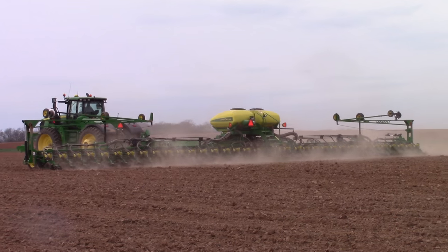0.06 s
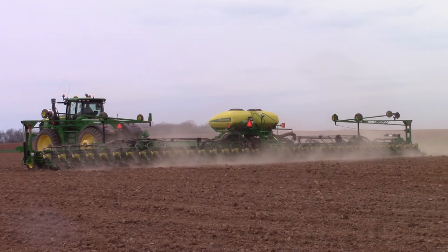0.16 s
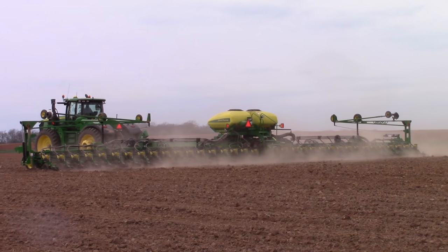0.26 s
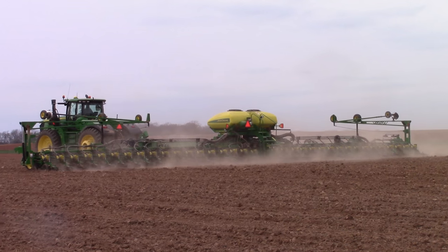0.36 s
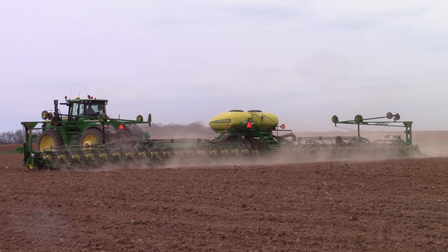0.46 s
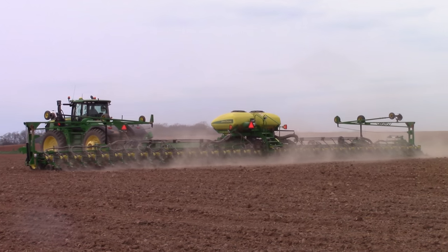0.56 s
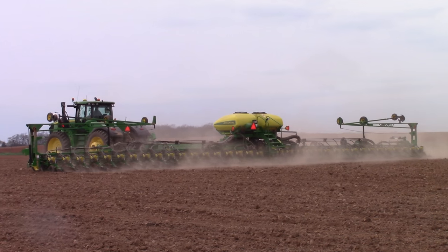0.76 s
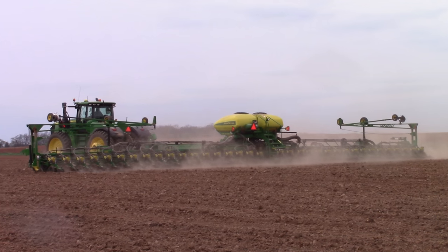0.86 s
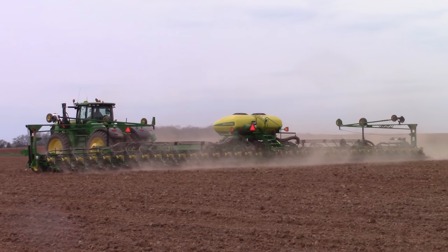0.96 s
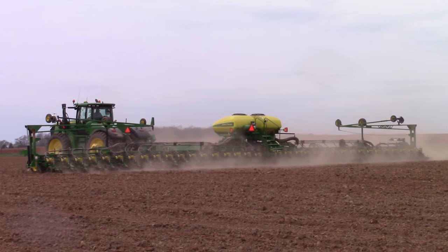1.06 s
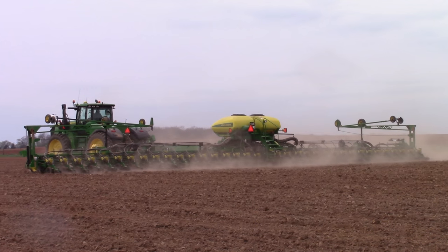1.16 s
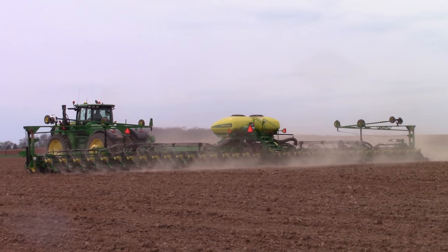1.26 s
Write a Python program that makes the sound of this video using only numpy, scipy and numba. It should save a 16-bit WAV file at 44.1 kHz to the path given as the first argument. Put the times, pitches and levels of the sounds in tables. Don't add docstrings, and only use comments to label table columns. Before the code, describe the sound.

Steady far-off tractor drone with a high mechanical whine, faint metallic squeaks and bursts of wind buffeting

```python
import sys
import numpy as np
from scipy import signal
from scipy.fft import rfft, irfft
from scipy.io import wavfile
from scipy.ndimage import uniform_filter1d
from numba import njit

SR = 44100
rng = np.random.default_rng(int(sys.argv[2]) if len(sys.argv) > 2 else 0)


def nominal_scale(level):
    x = np.asarray(level, float) / 20
    return 10 ** x


def int16_out(signal):
    q = np.round(np.clip(np.atleast_2d(signal).T, -1, 1) * 32767)
    wavfile.write(sys.argv[1], SR, q.astype(np.int16))


N = 57330

# pitch_hz, density_db (per Hz)
DRONE_BODY = [(30, -32), (110, -6), (300, -14.5), (500, -11), (620, -1.5), (850, -14.5), (960, -14),
              (1500, -14), (2500, -76)]
# pitch_hz, density_db (per Hz)
DRONE_HISS = [(880, -13.5), (1500, -6), (2100, -5.5), (2400, -9), (4700, -17), (5300, -23), (9400, -23.5),
              (13000, -45)]


def level(x, db):
    return x * nominal_scale(db) / np.sqrt(np.mean(x ** 2))


@njit
def moving_bandpass(x, hz, width_hz):
    y = np.empty(len(x))
    band_state, low_state = 0., 0.
    for i in range(len(x)):
        g = np.tan(np.pi * hz[i] / SR)
        damping = width_hz / hz[i]
        v = (band_state + g * (x[i] - low_state)) / (1 + g * (g + damping))
        band_state = 2 * v - band_state
        low_state = low_state + 2 * g * v
        y[i] = damping * v
    return y


def noise_band(hz, width_hz):
    centre_hz = np.zeros(N) + hz
    once = moving_bandpass(rng.standard_normal(N), centre_hz, 1. * width_hz)
    return level(moving_bandpass(once, centre_hz, 1. * width_hz), 0)


def walk(rate_hz):
    hold = int(SR / rate_hz)
    steps = np.repeat(rng.standard_normal(N // hold + 1), hold)
    return 1.3 * uniform_filter1d(uniform_filter1d(steps, hold), hold)[:N]


def curve(table):
    return np.interp(np.arange(N) / SR, *np.array(table).T)


def coloured_noise(table, db):
    hz = np.fft.rfftfreq(N, 1 / SR)
    point_hz, point_db = np.array(table).T
    shape_db = np.interp(np.log(hz + 1), np.log(point_hz), point_db)
    return level(irfft(rfft(rng.standard_normal(N)) * nominal_scale(shape_db), N), db)


def gate(start_s, length_s):
    t = np.arange(N) / SR
    to_edge_s = np.minimum(t - start_s, start_s + length_s - t)
    return np.clip(to_edge_s / 0.01 + .5, 0, 1) ** 2


def tone(hz, flicker_db, rate_hz):
    cycles = np.cumsum(hz) / SR + rng.random()
    return np.sqrt(2) * nominal_scale(flicker_db * walk(rate_hz)) * np.sin(2 * np.pi * cycles)


def machine_whine(carry_db):
    # pitch_hz, level_db (rms)
    whines = [(619.8, -38), (693.6, -48), (733, -48), (835, -53), (1240, -56), (1387, -53), (1594, -59),
              (1670, -54), (1862, -59), (2081, -55), (2428, -58), (2481, -62), (2774, -60), (3122, -65)]
    wander_hz, flicker_db = 1.1, 2.4
    out = 0
    for hz, db in whines:
        pitch_hz = hz + wander_hz * walk(9.15) * hz / 620
        out = out + nominal_scale(db + carry_db * hz / 900) * tone(pitch_hz, flicker_db, 14.02)
    return out


def engine_drone(carry_db):
    firing_hz, throb_depth = 104.7, 0.1
    firing_cycles = np.cumsum(firing_hz * (1 + 0.013 * walk(6.7))) / SR
    throb = 1 + throb_depth * np.sin(2 * np.pi * firing_cycles)
    body = coloured_noise(DRONE_BODY, -40) * nominal_scale(1.5 * walk(12))
    hiss = coloured_noise(DRONE_HISS, -42) * throb * nominal_scale(carry_db + 1.55 * walk(8.78))
    return body + hiss


def tractor():
    # time_s, level_db
    air_path = [(0, 1), (.2, -2), (.4, 1), (.6, 1), (.72, 2), (.86, -1.5), (1.1, 1), (1.3, 0.5)]
    carry_db = curve(air_path)
    return machine_whine(carry_db) + engine_drone(carry_db)


def disc_ringing():
    # pitch_hz, width_hz, level_db
    modes = [(9400, 500, -64), (11200, 600, -68), (12200, 400, -72), (12900, 500, -79), (14300, 450, -76),
             (14650, 280, -72)]
    drift, fit_db = .003, 5.0
    out = 0
    for hz, width_hz, db in modes:
        ring = noise_band(hz * (1 + drift * walk(18)), width_hz)
        out = out + nominal_scale(db + fit_db * walk(29.23)) * ring
    return out


def disc_squeals():
    # start_s, length_s, pitch_hz, level_db
    squeals = [(0, 0.048, 10400, -61), (0.031, .075, 11990, -65.5), (0.067, .085, 9490, -55.5),
               (0.071, .02, 9150, -57), (0.137, .045, 12100, -59), (0.237, .03, 11900, -58),
               (0.294, 0.042, 12800, -52), (0.342, 0.062, 12900, -67), (0.127, .06, 14250, -74),
               (0.252, .025, 10550, -60), (0.624, .05, 12200, -68), (0.664, .14, 9640, -61.5),
               (0.707, .06, 12100, -65), (0.783, 0.1, 12020, -59), (0.806, 0.034, 11200, -68),
               (0.807, 0.072, 12900, -73), (.945, 0.018, 12650, -57), (.995, 0.013, 12900, -63),
               (1.022, .015, 12750, -61), (0.962, .08, 12200, -64), (1.15, .06, 9310, -59.5),
               (1.258, 0.061, 12200, -62), (1.27, 0.026, 8990, -52), (1.275, .025, 9750, -60.5),
               (1.03, 0.043, 1935, -45.5), (0.887, .025, 6850, -62), (0.577, 0.02, 8500, -56),
               (1.074, .05, 14100, -57)]
    wander_hz, flicker_db = 30, 6.5
    grit, grit_width_hz = .7, 300
    out = 0
    for start_s, length_s, hz, db in squeals:
        clean = tone(hz + wander_hz * hz / 9900.0 * walk(60), flicker_db, 120)
        rough = noise_band(hz, grit_width_hz * hz / 9500.0)
        out = out + nominal_scale(db) * gate(start_s, length_s) * (clean + grit * rough)
    return out


def disc_scrapes():
    # start_s, length_s, pitch_hz, level_db
    scrapes = [(0.089, 0.067, 10800, -51.5), (.18, .045, 11250, -53.5), (0.253, 0.053, 11140, -59.5),
               (.225, 0.062, 8060, -56.5), (0.484, 0.017, 12400, -53), (0.854, 0.053, 11150, -50.5),
               (0.902, 0.11, 11200, -53.5), (1.035, 0.02, 11400, -59), (1.123, 0.018, 11100, -54),
               (1.146, .025, 11600, -51)]
    out = 0
    for start_s, length_s, hz, db in scrapes:
        chirps = sum(tone(hz * (1 + .018 * k) + 60 * walk(80), 8, 70) for k in (-1, 0, 1))
        grit = noise_band(hz, 1000)
        out = out + nominal_scale(db) * gate(start_s, length_s) * (0.66 * grit + 0.18 * chirps)
    return out


def planter():
    return disc_ringing() + disc_squeals() + disc_scrapes()


def wind_pressure():
    # time_s, level_db
    gust = [(0, -60), (.16, -56), (.2, -42), (.232, -37), (.252, -23), (.31, -24), (.35, -27), (.41, -26),
            (.45, -24), (.49, -28), (.51, -48), (.66, -54), (.7, -44), (.8, -44), (.87, -43), (.93, -44),
            (.96, -50), (1.3, -54)]
    # centre_s, length_s, level_db, whirl_hz
    eddies = [(.279, .009, -13, 430), (.287, .009, -11, 250), (.299, .017, -16, 450),
              (.362, .008, -20, 450), (.374, .019, -12.5, 285), (.388, .01, -17, 260),
              (.412, .012, -21, 180), (.43, .01, -22, 200), (.461, .011, -13, 230), (.47, .008, -14, 420),
              (.481, .011, -12, 250), (.499, .01, -22, 210), (.694, .006, -32, 280), (.702, .006, -30, 200),
              (.72, .008, -30, 320), (.727, .008, -33, 140), (.746, .005, -33, 300), (.776, .007, -29, 180),
              (.807, .006, -32, 250), (.824, .005, -34, 180), (.841, .007, -29, 210),
              (.851, .005, -33, 230), (.882, .012, -24, 185), (.903, .014, -28, 270),
              (.913, .006, -32, 170), (.93, .008, -34, 170), (1.25, .022, -35, 150)]
    t = np.arange(N) / SR
    power = nominal_scale(curve(gust) + 2.5 * walk(89.9)) ** 2
    weighted_hz = power * 250
    for centre_s, length_s, db, hz in eddies:
        burst = (nominal_scale(db) * np.exp(-((t - centre_s) / length_s * 2) ** 4)) ** 2
        power = power + burst
        weighted_hz = weighted_hz + burst * hz
    return np.sqrt(power), weighted_hz / power


def soften(x, low_hz, high_hz):
    sos = signal.butter(1, [low_hz, high_hz], "band", fs=SR, output="sos")
    return signal.sosfiltfilt(sos, x)


def wind():
    # pitch_hz, density_db (per Hz)
    rasp_colour = [(200, -25), (450, -3), (700, 0), (1000, -7), (1400, -17), (2000, -28), (3500, -57)]
    rasp_db, apart_db, apart_fizz_db = -8, -10, -13
    push, whirl_hz = wind_pressure()

    swirl = tone(whirl_hz * (1 + .17 * walk(150)), 1.5, 150)
    swirl = swirl + .95 * noise_band(whirl_hz * .75, 430)
    body = soften(push * swirl, 60, 950)

    hard = push * (push / nominal_scale(-8)) ** (1.4 - 1) * (whirl_hz / 300) ** 1.6
    rasp = nominal_scale(rasp_db) * hard * coloured_noise(rasp_colour, 0)
    apart = nominal_scale(apart_db) * hard * coloured_noise(rasp_colour, 0)

    mid = body + rasp
    fizz = nominal_scale(apart_fizz_db - rasp_db) * soften(rasp, 840, 2500)
    side = apart + fizz - nominal_scale(-9.5) * soften(body, 284, 640)
    return mid + side * np.array([[1], [-1]])


def scene():
    engine, discs = tractor(), planter()
    wide_drone = nominal_scale(-37) * np.std(engine) * coloured_noise(DRONE_BODY[:-1] + DRONE_HISS[2:], 0)
    side = wide_drone + nominal_scale(-20) * discs
    return engine + discs + side * np.array([[1], [-1]]) + wind()


def roll_off(x):
    return signal.sosfilt(signal.butter(12, 15450, fs=SR, output="sos"), x)


def record(dry):
    bass_cut = signal.butter(2, 70, "high", fs=SR, output="sos")
    top_cut = signal.ellip(6, 1, 45, 15080, fs=SR, output="sos")
    mix = signal.sosfilt(np.vstack([bass_cut, top_cut]), dry)
    return roll_off(mix)


dry = scene()
out = record(dry)
int16_out(out)
```